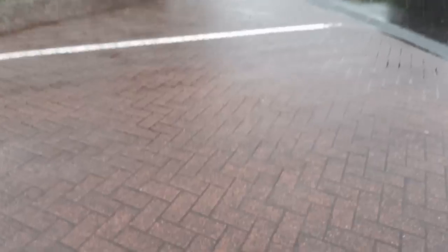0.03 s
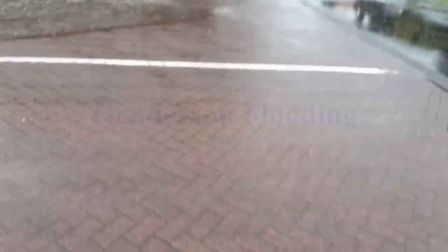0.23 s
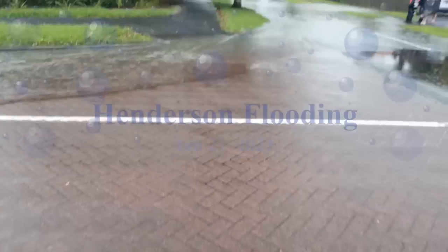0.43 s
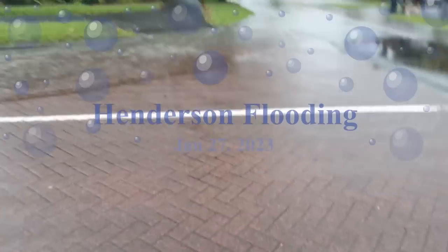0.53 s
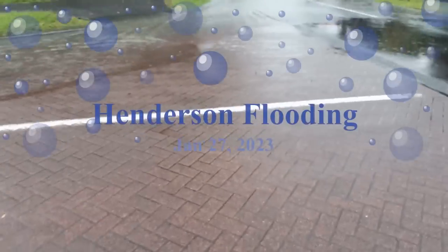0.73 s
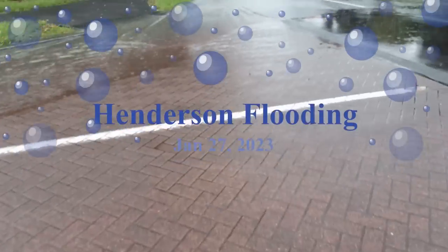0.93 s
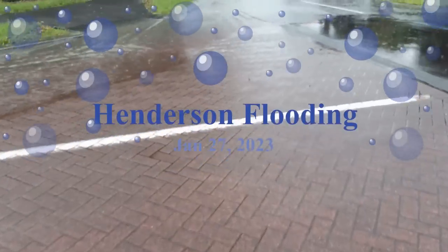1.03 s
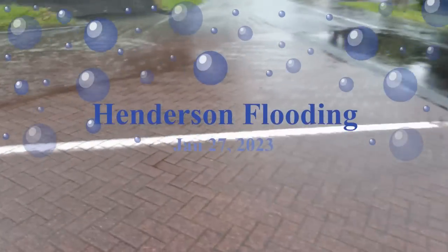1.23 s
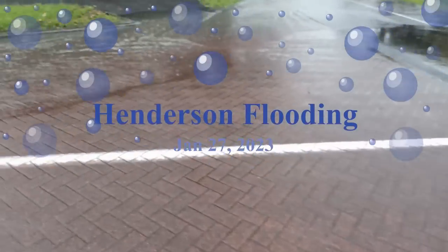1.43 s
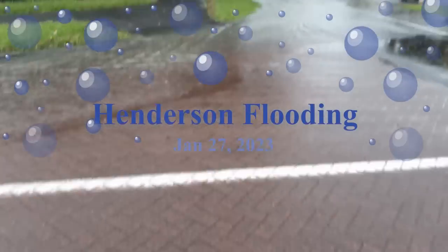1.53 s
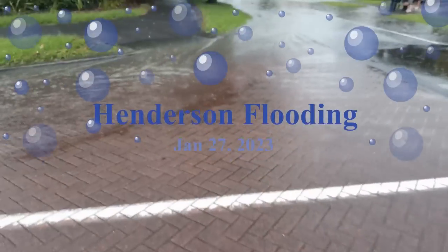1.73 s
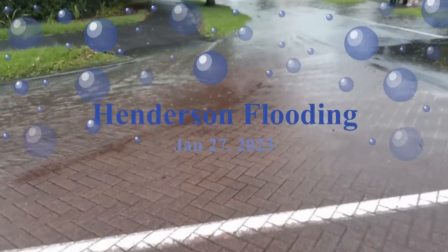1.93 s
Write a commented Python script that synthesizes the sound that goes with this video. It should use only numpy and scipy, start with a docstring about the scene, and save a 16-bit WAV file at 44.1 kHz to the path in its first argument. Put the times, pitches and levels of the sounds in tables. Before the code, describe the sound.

Steady downpour on a wet paved street, fine spatter over low rumble and rushing run-off water

```python
"""After a short silence, heavy rain on wet paving cuts in, heard outdoors on a phone with two unlike
microphone ports. Countless far drops fuse to a hiss, made of flickering noise bands; nearer drops
spatter over it as tiny rings. The street rumbles and run-off water rushes underneath (coloured noise)
with a faint wavering hum (noise in narrow bands). Close splashes and ticks are short noise bursts."""
import sys
import numpy as np
from scipy import signal
from scipy.fft import rfft, irfft
from scipy.io import wavfile
from scipy.ndimage import uniform_filter1d

SR = 44100
rng = np.random.default_rng(int(sys.argv[2]) if len(sys.argv) > 2 else 0)


def persist_wave(psi):
    """Save psi, clipped to +-1, as 16-bit WAV."""
    counts = np.round(np.clip(psi, -1, 1) * 32767).astype(np.int16)
    wavfile.write(sys.argv[1], SR, np.atleast_2d(counts).T)


def field_ratio(decibels):
    """Amplitude ratio for a level in dB (20 dB per decade); scalars and array-likes work."""
    return 10 ** (np.asarray(decibels, dtype=float) / 20)


N = 88200


def rms_one(x):
    """Scale a sound so that its overall strength (rms) is 1."""
    return x / np.sqrt(np.mean(x ** 2) + 1e-20)


def in_time(rows):
    """Join the table's points by straight lines in time, one curve for each column after the first."""
    times_s, *columns = np.transpose(rows)
    return [np.interp(np.arange(N) / SR, times_s, column) for column in columns]


def at_hz(points, hz):
    """Read a table between its points, with frequency on a log axis."""
    points_hz, values = np.transpose(points)
    return np.interp(np.log(hz + 1), np.log(points_hz), values)


def drift(rate_hz):
    """Slow random wandering with rms 1: noise smoothed twice, each time with its corner at rate_hz."""
    hop = 40   # samples between the points of the curve
    pole = np.exp(-2 * np.pi * rate_hz * hop / SR)
    noise = rng.standard_normal(N // hop + 2002)
    slow = signal.lfilter([1], [1, -2 * pole, pole * pole], noise)[2000:]   # skip the filter's start
    return np.interp(np.arange(N) / hop, np.arange(len(slow)), rms_one(slow))


def resonance(x, hz, width_hz):
    """A two-pole resonator: a click makes it ring, and a wider band dies sooner; peak gain about 1."""
    pole = np.exp(-np.pi * width_hz / SR)
    angle = 2 * np.pi * min(hz, SR / 2.2) / SR
    top = np.array([1, 0, -1]) * (1 - pole * pole) / 2
    return signal.lfilter(top, [1, -2 * pole * np.cos(angle), pole * pole], x + 1e-18)


def field(spectrum, patchy_db, flicker_hz):
    """Wide noise of a given colour, rms 1, whose half-octave bands flicker partly on their own."""
    # how alike the two ports hear it: pitch_hz, likeness (0 = unrelated, 1 = the same)
    likeness = [(60, 0.79), (200, 0.99), (400, 0.95), (700, 0.36), (1200, 0.58), (2400, 0.31), (5000, 0.21),
                (15000, 0)]
    hz = np.arange(N // 2 + 1) * SR / N
    colour_db = at_hz(spectrum, hz) - 60 * (hz < spectrum[0][0] / 2)   # nearly nothing far below the table
    mid, side = rfft(rng.standard_normal((2, N))) * field_ratio(colour_db)
    alike = np.clip(at_hz(likeness, hz), 0, 1)
    both = np.sqrt(1 + alike) * mid + np.sqrt(1 - alike) * side * [[1], [-1]]
    out = 0
    together = drift(3.0)   # flicker that all bands share
    half_octave = 2 * np.log2(hz + 1)
    for k in range(9, 29):
        share = np.cos(np.pi / 2 * np.clip(half_octave - k, -1, 1)) ** 2   # neighbours crossfade
        band = irfft(both * share, N)
        out = out + band * field_ratio(patchy_db * (together / 2 + drift(flicker_hz)))
    return rms_one(out)


def hiss_of_far_drops(spray_db):
    """Far drops are too many to tell apart, so they fuse to noise; spray_db lifts or lowers its treble."""
    # colour of the hiss: pitch_hz, level_db (per Hz, relative)
    hiss_colour = [(400, -18), (800, -7), (1000, -1), (1300, -1.5), (1500, -4), (2000, -2), (2700, -5.6),
                   (3200, -7.4), (4500, -10), (6000, -12), (6700, -12.6), (7500, -16), (8500, -21.5),
                   (10500, -19.5), (12500, -19.7), (14500, -22.7), (15500, -26)]
    hiss = field(hiss_colour, patchy_db=1.48, flicker_hz=36.0)
    high_pass = signal.butter(2, 7500, "high", fs=SR, output="sos")   # fine spray sounds above 7500 Hz
    spray = signal.sosfiltfilt(high_pass, hiss)
    return hiss + (field_ratio(spray_db) - 1) * spray


def spatter_of_near_drops():
    """Each nearer drop is a click that rings about one cycle at one of 14 pitches; rms 1."""
    drops_per_s = 730   # typical rate, which wanders
    low_hz, high_hz = 1420, 14200
    width_share = 4.3 / 4.9   # width of each resonance as a share of its pitch
    tilt_db = -3   # gain per octave upward
    size_db = 3.5 * np.minimum(rng.exponential(1, N), 4.0)   # many small drops, few big ones
    sizes = field_ratio(size_db) * rng.choice([-1, 1], N)
    born = rng.random(N) < drops_per_s * field_ratio(3.0 * drift(8.0)) / SR
    side_db = rng.normal(0, 2.4, N) * [[1], [-1]]   # each drop leans to one side
    drops = sizes * born * field_ratio(side_db)
    dealt = rng.integers(0, 14, N)   # which pitch each drop gets
    rings = 0
    for k, hz in enumerate(np.geomspace(low_hz, high_hz, 14)):
        ring = resonance(drops * (dealt == k), hz, width_share * hz)
        rings = rings + ring * field_ratio(tilt_db * np.log2(hz / low_hz))
    return rms_one(rings)


def rain():
    """The hiss of far drops and the spatter of nearer ones swell and sink together."""
    # strength of the downpour: time_s, level_db, spray_db (gain of the fine spray within the hiss)
    downpour = [(.11, -43.5, -10), (.3, -45.5, -17), (.55, -46, -1.5), (.8, -47.5, -6), (.98, -46, -4),
                (1.09, -47.5, 10), (1.2, -45.5, 2.5), (1.4, -48, 0.5), (1.6, -46.5, 0), (1.8, -47, -0.5),
                (2, -48, 0.5)]
    level_db, spray_db = in_time(downpour)
    spatter_db = -68 + level_db - level_db.mean()
    return field_ratio(level_db) * hiss_of_far_drops(spray_db) + field_ratio(spatter_db) * spatter_of_near_drops()


def wavering_hum():
    """Noise sent twice through a narrow resonance becomes a hum whose strength wavers."""
    # parts of the hum: pitch_hz, width_hz (of each of the two passes), level_db
    hum_parts = [(50.4, 9.1, -50), (105.15, 11.7, -54.5), (221.1, 19, -54)]
    hum = 0
    for hz, width_hz, level_db in hum_parts:
        # a shared noise and a second one, mixed differently for left and right
        noise = [[1, 0.81], [1, 0.16]] @ rng.standard_normal((2, 2 * N))
        tone = resonance(resonance(noise, hz, width_hz), hz, width_hz)
        hum = hum + field_ratio(level_db) * rms_one(tone[:, N:])   # the first half only lets it build up
    return hum


def street():
    """Low rumble and rushing run-off water, each noise of its own colour, with a hum that wavers."""
    # strength over time: time_s, rumble_db, run_off_db
    street_levels = [(.11, -42, -50.5), (.25, -42.5, -48), (.4, -41.5, -48), (.55, -42.5, -52),
                     (.66, -42.5, -47.5), (.76, -41.5, -47.5), (.9, -41, -42.5), (1.05, -40, -44.5),
                     (1.2, -41.5, -46), (1.32, -41, -50.5), (1.45, -42.5, -50), (1.6, -44.5, -52),
                     (1.8, -41, -51), (2, -43.5, -49)]
    # colour of the rumble: pitch_hz, level_db (per Hz, relative)
    rumble_colour = [(35, -52), (50, -51.5), (70, -2), (100, 2.7), (140, 0.5), (220, 3), (320, 3.1),
                     (420, -5), (650, -9), (900, -32)]
    # colour of the run-off water: pitch_hz, level_db (per Hz, relative)
    run_off_colour = [(300, -33), (420, -3.5), (550, 3.5), (670, 2), (820, 8), (1000, -6), (1300, -3.5),
                      (1600, -5.5), (2200, -30)]
    rumble_db, run_off_db = in_time(street_levels)
    hum = wavering_hum()
    rumble = field_ratio(rumble_db) * field(rumble_colour, patchy_db=.8, flicker_hz=10.0)
    run_off = field_ratio(run_off_db) * field(run_off_colour, patchy_db=1.5, flicker_hz=20.0)
    return rumble + run_off + hum


def splashes():
    """Each splash is a short, even burst of crackle around its centre pitch, with a faint spray after it."""
    # close splashes and ticks: start_s, level_db (roughly the peak), pitch_hz (centre), length_s,
    # spread (to each side, as a share of the centre pitch)
    close_splashes = [(.1283, -40, 5000, .0015, .6), (.2678, -29, 1700, .0012, 2.5),
                      (.540, -33, 7500, .003, 1.2), (.5445, -41, 12000, .001, .6),
                      (.5608, -29, 2600, .009, .5), (.5625, -25, 4500, .0035, .3),
                      (.5620, -36, 12000, .003, .6), (.5670, -25, 4200, .0025, .5),
                      (.5670, -34, 12500, .002, .6), (.5964, -27, 2700, .0025, .3),
                      (.6002, -26, 3500, .002, .22), (.602, -34, 3200, .006, .35),
                      (.6806, -34, 13000, .0014, .6), (.6885, -41, 5500, .001, .3),
                      (.6995, -47, 12500, .01, .03), (.7993, -41, 4500, .001, .5),
                      (1.099, -46, 12000, .003, .3), (1.1440, -39, 12500, .0012, .5),
                      (1.1585, -34, 4550, .009, .04), (1.1612, -28, 5200, .0014, .25),
                      (1.1636, -30, 5400, .0045, .07), (1.163, -36, 2650, .007, .1),
                      (1.161, -40, 13000, .007, .6), (1.578, -38, 4450, .004, .1),
                      (1.5955, -37, 2600, .007, .15), (1.6055, -38, 12000, .0015, .7),
                      (1.618, -44, 2450, .012, .1), (1.628, -37, 6000, .0015, 2.2),
                      (1.662, -41, 2500, .01, .15), (1.667, -43, 6000, .002, .8),
                      (1.6875, -38, 13000, .0015, .5), (1.742, -42, 2050, .012, .05),
                      (1.829, -44, 5500, .002, .3), (1.9085, -37, 4000, .002, .2)]
    tail_db, tail_s = -13.5, .006   # the spray against the burst, and its decay time
    out = np.zeros((2, N + SR))
    t = np.arange(2048) / SR
    noises = rng.standard_normal((len(close_splashes), 3, 2560))
    for (start_s, level_db, pitch_hz, length_s, spread), noise in zip(close_splashes, noises):
        burst = np.sin(np.pi * np.clip(t / length_s, 0, 1) ** .7)   # rises faster than it falls
        tail = field_ratio(tail_db) * np.exp(-t / tail_s)
        edges_hz = np.minimum(pitch_hz * (1 + spread) ** np.array([-1, 1]), SR / 2.2)
        band_pass = signal.butter(2, edges_hz, "band", fs=SR, output="sos")
        # one noise in both ports, plus a weaker one of each port's own
        crackle = signal.sosfilt(band_pass, noise[0] + .5 * noise[1:])
        # keep the crackle evenly strong over each millisecond
        crackle = crackle / np.sqrt(uniform_filter1d(crackle ** 2, size=44) + 1e-12)
        start = int(start_s * SR)
        out[:, start:start + 2048] += field_ratio(level_db) * crackle[:, 500:2548] * (burst + tail) / 2
    return out[:, :N]


def scene():
    """Rain and splashes reach the right port later than the left; the street is all around."""
    port_lag_s = .00048
    left, right = rain() + splashes()
    return np.array([left, np.roll(right, round(port_lag_s * SR))]) + street()


def low_pass(x):
    """Removes everything above the highest recorded frequency."""
    return signal.sosfilt(signal.butter(12, 16820, fs=SR, output="sos"), x)


def record(dry):
    """The right port resonates; deep bass and top treble are cut; the sound opens abruptly."""
    # resonances of the right port against the left: pitch_hz, gain_db
    right_port = [(100, 4.8), (420, 5.3), (800, 7.2), (1000, 6.8), (1300, 6.7), (1700, 10.8), (2200, 10.3),
                  (2700, 11.9), (3200, 7.2), (3800, 9.6), (4500, 11.9), (5300, 16.0), (6000, 15.0),
                  (6700, 8.0), (7500, -0.3), (8500, -0.2), (9500, 1.8), (10500, 6.5), (11500, 11.1),
                  (12500, 12.9), (13500, 11.5), (14500, 7.4), (15500, 4.8)]
    open_s = .1119   # the microphone opens
    hz = np.arange(N // 2 + 1) * SR / N
    right = irfft(rfft(dry[1]) * field_ratio(at_hz(right_port, hz)), N)
    bass_cut = signal.butter(4, 55, "high", fs=SR, output="sos")
    top_cut = signal.cheby2(14, 45, 15950, fs=SR, output="sos")   # 45 dB down from 15950 Hz upward
    mix = signal.sosfilt(bass_cut, [dry[0], right])
    mix = signal.sosfilt(top_cut, mix)
    is_open = np.arange(N) >= open_s * SR
    return low_pass(mix * is_open)


dry = scene()
out = record(dry)
persist_wave(out)
```